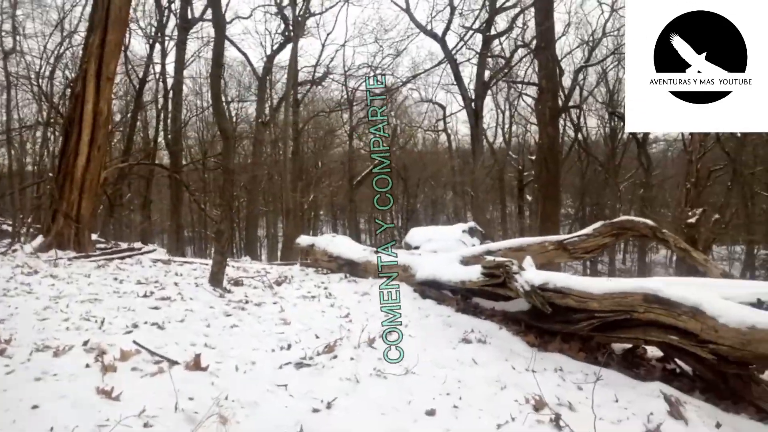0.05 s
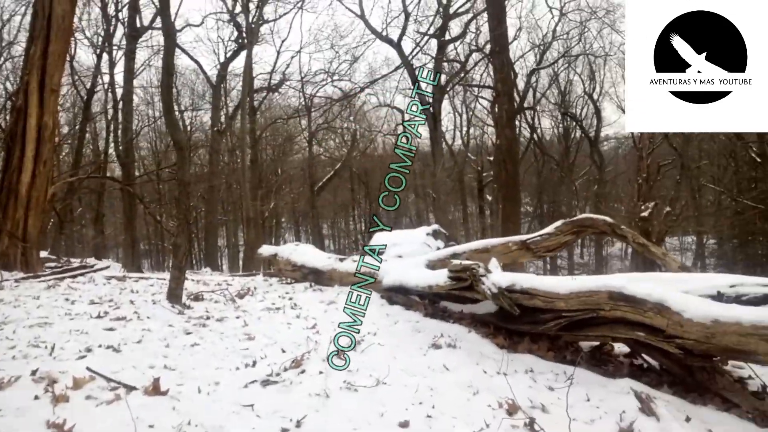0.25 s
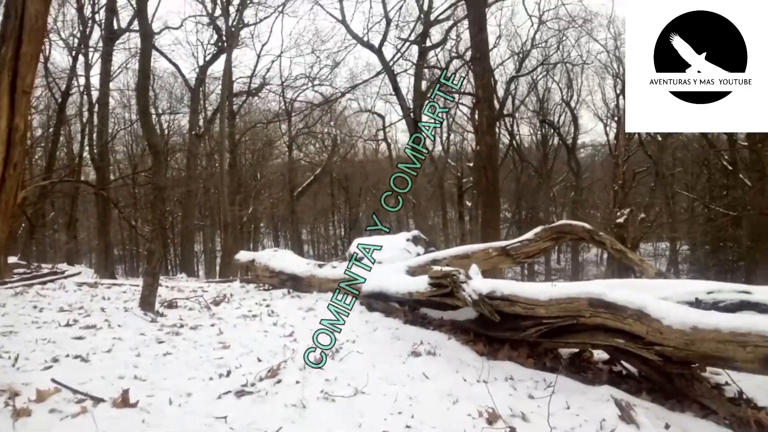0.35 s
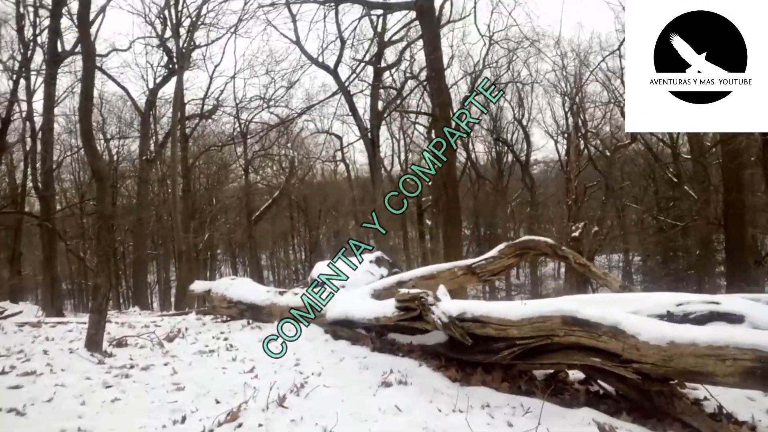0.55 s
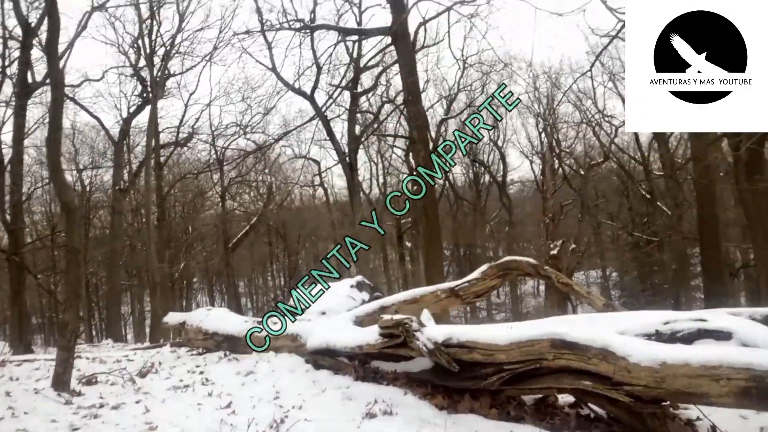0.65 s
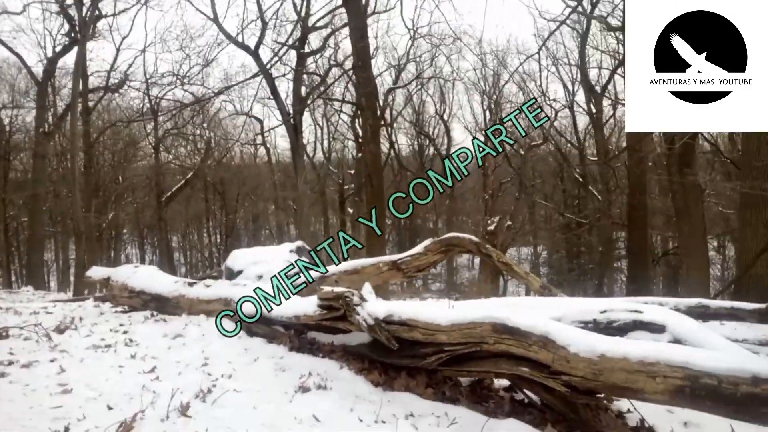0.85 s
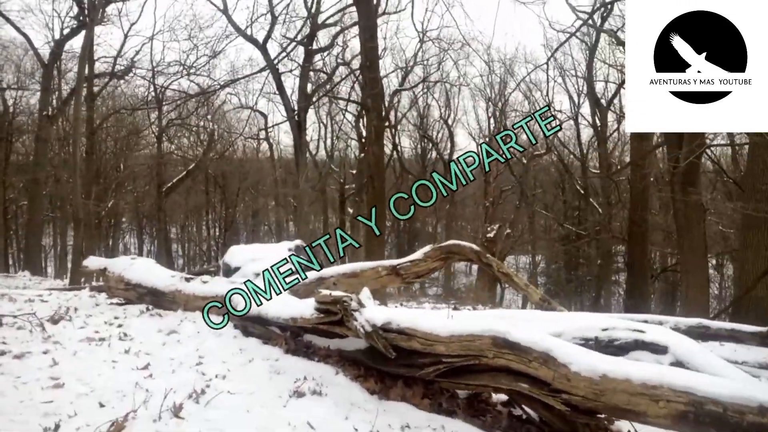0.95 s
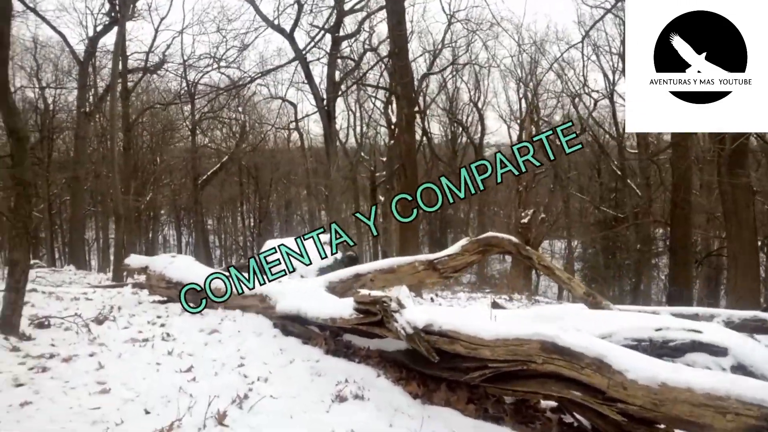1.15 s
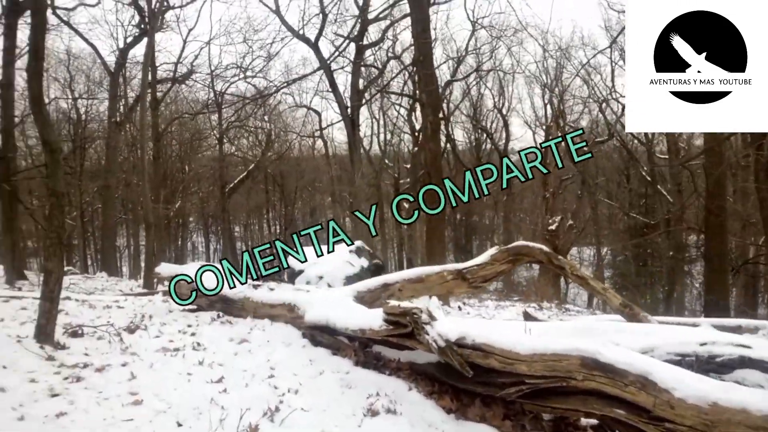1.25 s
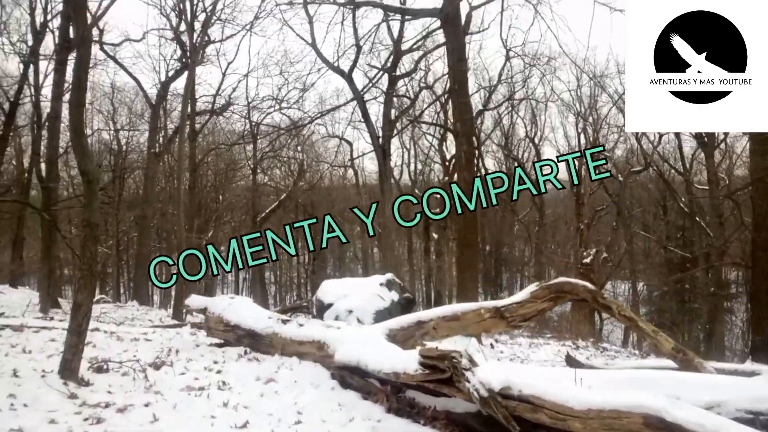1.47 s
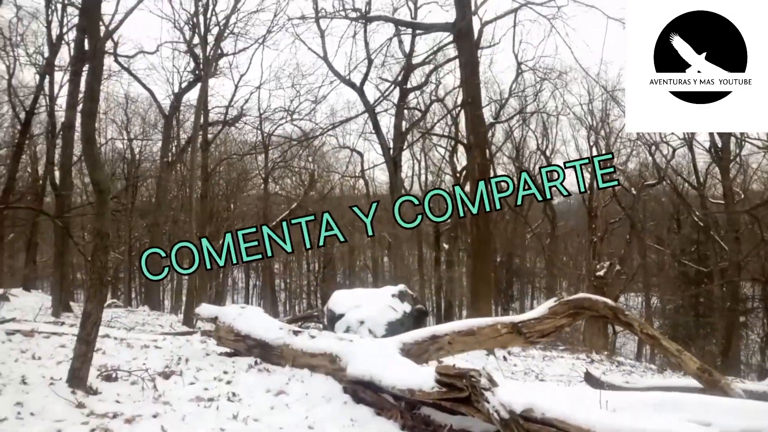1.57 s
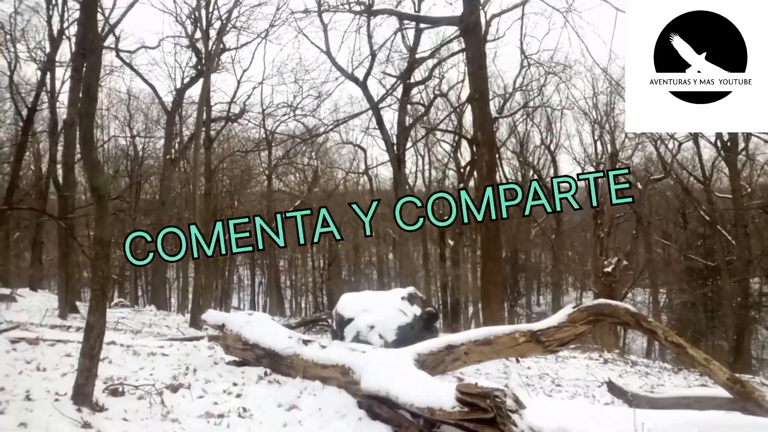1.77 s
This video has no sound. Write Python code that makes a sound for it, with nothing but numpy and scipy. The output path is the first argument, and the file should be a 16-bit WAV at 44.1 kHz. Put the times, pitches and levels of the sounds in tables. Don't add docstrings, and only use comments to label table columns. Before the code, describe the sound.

A boot breaks through crusted snow, a low thud leading into a sharp, splintering crunch, then crumbs settle and a softer step follows, heard close on a hand-held phone in a quiet winter forest.

```python
import sys
import numpy as np
from scipy import signal
from scipy.io import wavfile

SR = 44100
rng = np.random.default_rng(int(sys.argv[2]) if len(sys.argv) > 2 else 0)


def store_wav(level_fs):
    pcm = np.round(np.clip(np.atleast_2d(level_fs), -1, 1) * 32767)
    wavfile.write(sys.argv[1], SR, pcm.T.astype(np.int16))


def decibels_to_gain(level_db):
    exponent = np.asarray(level_db, float) / 20
    return 10 ** exponent


N = 79380


def unit_rms(x):
    return x / np.sqrt(np.mean(x ** 2) + 1e-20)


def level_at(spectrum, hz):
    points = np.array(spectrum)
    return np.interp(np.log(hz), np.log(points[:, 0]), points[:, 1])


def swell(peak_s, db, rise_s, fall_s):
    t = np.arange(N) / SR - peak_s
    distance = np.where(t < 0, -t / max(rise_s, 1e-3), t / max(fall_s, 1e-3))
    return decibels_to_gain(np.maximum(db - 20 * distance ** 0.95, -160))


def drift(rate_hz):
    r = np.exp(-2 * np.pi * rate_hz / SR)
    wander = signal.lfilter([1], [1, -2 * r, r * r], rng.standard_normal(N + 9000))
    return unit_rms(wander[9000:])


def ring(clicks, hz, t60):
    r, w = decibels_to_gain(-60 / (t60 * SR)), 2 * np.pi * hz / SR
    return signal.lfilter([0, np.sin(w)], [1, -2 * r * np.cos(w), r * r], clicks + 1e-18)


def low_cut(x, hz):
    return signal.sosfilt(signal.butter(5, hz, "high", fs=SR, output="sos"), x)


def bandpass(low_hz, high_hz):
    return signal.butter(2, [low_hz, high_hz], "band", fs=SR, output="sos")


def grains(bursts, spectrum, per_s, spread_db, cycles, clump_db, colour_db, low_hz, count=26):
    size_db = spread_db * np.minimum(rng.exponential(1, N), 3.0) + clump_db * drift(110)
    sizes = decibels_to_gain(size_db) * rng.choice([-1, 1], N)
    clicks = sizes * (rng.random(N) < per_s / SR)
    dealt = rng.integers(0, count, N)
    force = np.array([swell(*burst[:4]) for burst in bursts])
    tilt = np.array(bursts)[:, 4]
    colour = colour_db * rng.standard_normal((len(bursts), count))
    pitches = np.geomspace(low_hz, 8000, count)
    weight = decibels_to_gain(level_at(spectrum, pitches)) * np.sqrt(pitches)
    weight = weight / np.sqrt(np.sum(weight ** 2))
    out = 0
    for k, hz in enumerate(pitches):
        own = clicks * (dealt == k)
        t60 = cycles / hz
        gain = weight[k] / np.std(ring(own, hz, t60))
        push = decibels_to_gain(tilt * np.log2(hz / 2500) + colour[:, k]) @ force
        out = out + gain * ring(own * push, hz, t60)
    return low_cut(out, low_hz)


def crumbling_bands(rows, width):
    out, rough = 0, rng.standard_normal(N) * decibels_to_gain(2.0 * drift(120))
    for peak_s, db, rise_s, fall_s, hz in rows:
        sos = bandpass(hz / (1 + width), hz * (1 + width))
        swelling = signal.sosfilt(sos, swell(peak_s, db, rise_s, fall_s) * rough)
        out = out + swelling / np.std(signal.sosfilt(sos, rough))
    return out


def forest_air():
    # f [Hz], level [dB]
    air_spectrum = [(18, -37), (30, -4.5), (82, -1.5), (165, -7), (755, -10.5), (1900, -36), (2730, -33),
                    (7300, -40), (8000, -46), (10400, -90.5)]
    air_db = -60.5
    edges = 28 * 2 ** np.arange(0, 8.5, .5)
    out, white = 0, rng.standard_normal((2, N))
    for k, (low, high) in enumerate(zip(edges, edges[1:])):
        band = signal.sosfilt(bandpass(low, high), white[k % 2])
        out = out + band * decibels_to_gain(level_at(air_spectrum, np.sqrt(low * high)) + 1.5 * drift(8))
    return decibels_to_gain(air_db) * unit_rms(out)


def plate_snaps():
    # t [s], peak level [dB], ring f [Hz]
    snap_events = [(0.0041, -40.5, 1384), (0.118, -51, 2350), (0.1223, -49.5, 2340), (0.2363, -36, 3000),
                   (0.2495, -42, 1150), (0.29, -40, 3460), (0.3316, -31, 1310), (0.3449, -16.5, 5420),
                   (0.3781, -27, 2800), (0.3988, -29, 2770), (0.4057, -26.5, 2870), (0.411, -29, 3300),
                   (0.4208, -26, 2960), (0.435, -24, 1415), (0.4581, -24, 3240), (0.4671, -22.5, 1480),
                   (0.4762, -18.5, 1490), (0.4868, -13, 2300), (0.4889, -13, 1190), (0.501, -9.5, 1684),
                   (0.5157, -18.5, 1466), (0.5325, -34, 2620), (0.5455, -31.5, 1420), (0.5554, -37.5, 1150),
                   (0.573, -29.5, 1370), (0.5851, -31, 2050), (0.5894, -29, 1500), (0.602, -26, 1484),
                   (0.623, -37, 1770), (0.629, -29.5, 1540), (0.6447, -34, 1648), (0.6547, -41, 1720),
                   (0.6633, -37.5, 2170), (0.6814, -38.5, 1660), (0.6933, -44, 1610), (0.7027, -36.5, 1470),
                   (0.7136, -47.5, 1310), (0.7393, -43, 1860), (0.779, -47, 1750), (0.7984, -42, 1590),
                   (0.8147, -42, 3210), (0.8503, -36, 3200), (0.8673, -49, 1550), (0.9731, -44, 1360),
                   (0.9893, -43, 1420), (1.1106, -50, 2810), (1.122, -43, 2330), (1.2035, -40.5, 2900),
                   (1.21, -39, 2950), (1.25, -44, 3100), (1.28, -48, 2880), (1.302, -49, 2500),
                   (1.3586, -38, 864), (1.3888, -36, 1200), (1.3968, -31.5, 1406), (1.4132, -34, 1500),
                   (1.4213, -33.5, 960), (1.4461, -36.5, 2000), (1.504, -48, 1277), (1.7012, -61, 800)]
    ring_cycles = 24.5
    all_db, crack_db, crack_s = -1, -8, .002
    length = 800
    out, t = np.zeros(N + length), np.arange(length) / SR
    splinters = signal.sosfilt(bandpass(1500, 5500), rng.standard_normal((len(snap_events), length)))
    for (s, db, hz), noise in zip(snap_events, splinters / splinters.std()):
        onset = np.minimum(t / .0004, 1)
        body = np.sin(2 * np.pi * hz * t) * decibels_to_gain(-60 * t * hz / ring_cycles) * onset
        crack = decibels_to_gain(crack_db) * noise * np.exp(-t / crack_s)
        start = int(s * SR)
        out[start:start + length] += decibels_to_gain(db + all_db) * (body + crack)
    return low_cut(out[:N], 655)


def crumb_rustle():
    # peak t [s], level [dB], rise [s], fall [s], tilt [dB/octave]
    rustle_events = [(.008, -51, 0.037, 0.025, 2.5), (.081, -72, 0.0053, .01, 11),
                     (.053, -62.5, 0.0074, 0.056, 5), (.118, -57, 0.0094, 0.036, 5),
                     (.158, -65.5, 0.0073, 0.054, 4), (.2, -59.5, 0.0067, .01, 4),
                     (.603, -44.5, 0.081, 0.088, -4.5), (.64, -48, 0.045, 0.052, -3.5),
                     (.69, -51.5, 0.053, 0.071, -4), (.725, -52, 0.051, 0.032, -5),
                     (.781, -57, 0.003, 0.018, -1), (.798, -51, 0.028, 0.038, -2),
                     (.835, -57, 0.033, 0.022, -5.5), (.856, -50, 0.017, 0.026, 2.5),
                     (.977, -49, 0.019, 0.016, 1.5), (1.075, -64.5, 0.082, 0.12, 1),
                     (1.125, -58.5, 0.013, 0.045, 3), (1.197, -54, 0.0024, 0.0064, 3),
                     (1.209, -52, 0.019, 0.0093, 1), (1.22, -53.5, 0.0085, 0.0073, 2),
                     (1.252, -50.5, 0.027, 0.034, 1), (1.283, -56, 0.019, 0.026, 0),
                     (1.305, -55.5, 0.022, 0.018, -0.5), (1.55, -60.5, 0.067, .04, 5),
                     (1.605, -69, 0.013, 0.013, 6.5), (1.345, -60.5, 0.046, .02, 2),
                     (1.645, -72.5, 0.014, 0.014, 7.5), (1.72, -74, 0.018, 0.3, 0.5)]
    # f [Hz], level [dB per Hz]
    crumb_spectrum = [(530, -49), (900, -19), (1170, -5.5), (1650, -6.5), (4030, -16.5), (5400, -24),
                      (7300, -27.5), (8000, -38), (10400, -74)]
    return grains(rustle_events, crumb_spectrum, per_s=8000, spread_db=3.8, cycles=32.0,
                  clump_db=1.5, colour_db=3.5, low_hz=1278)


def sole_rubs():
    # peak t [s], level [dB], rise [s], fall [s], ring f [Hz]
    rub_events = [(.125, -66, .015, 0.032, 2230), (.68, -53, .12, 0.097, 1643),
                  (.7, -52.5, 0.029, 0.046, 4360), (.73, -64.5, 0.19, 0.042, 5430),
                  (.82, -56, 0.029, 0.09, 1620), (.855, -54, 0.11, 0.012, 3130),
                  (.98, -51, 0.013, 0.017, 2750), (.98, -52, 0.032, 0.019, 1410),
                  (1.21, -54.5, 0.024, 0.057, 2970), (.012, -54.5, 0.018, 0.017, 5610),
                  (.855, -62, 0.012, .025, 6000), (.855, -67, 0.009, .025, 4510),
                  (.79, -67, 0.042, 0.021, 5280), (1.252, -63, 0.012, 0.045, 4500),
                  (1.29, -56.5, 0.056, 0.036, 2840)]
    return crumbling_bands(rub_events, width=.055)


def body_jolts():
    # centre t [s], peak level [dB], ring f [Hz], length [s]
    jolt_events = [(0.019, -50.5, 77.5, 0.02), (0.224, -34, 104, 0.0089), (0.2356, -23.5, 92.3, 0.0071),
                   (0.2514, -34, 110, 0.0079), (0.268, -33.5, 104, 0.0084), (0.283, -37, 70, 0.015),
                   (0.161, -47.5, 240, 0.0044), (.08, -59.5, 90, 0.013), (0.459, -50.5, 70, .012),
                   (.345, -38.5, 89.2, 0.016), (0.404, -49.5, 62.6, 0.047), (0.4896, -23.5, 415, 0.0035),
                   (0.514, -35, 333, 0.0061), (0.49, -35, 203, 0.0094), (.515, -43.5, 110, 0.015),
                   (1.419, -33, 403, 0.0055), (1.36, -41.5, 844, 0.0039), (0.573, -43.5, 62, 0.016),
                   (0.669, -55.5, 85, 0.014), (0.794, -44.5, 66, 0.02), (0.866, -45.5, 56.7, 0.02),
                   (0.975, -51.5, 69, 0.018), (1.182, -55, 70.6, 0.014), (1.249, -49, 69, 0.0092),
                   (1.284, -44, 64, 0.012), (1.344, -51.5, 67.5, 0.039), (1.437, -49.5, 71, 0.0095),
                   (1.504, -50, 72, 0.039), (1.559, -53, 72, 0.017), (1.643, -50.5, 65.3, 0.015),
                   (1.743, -41.5, 72, 0.0081), (1.76, -40, 60, .012), (1.778, -44.5, 70, 0.0083)]
    knock = 0.21
    out = np.zeros(N)
    for s, db, hz, length in jolt_events:
        t = np.arange(N) / SR - s
        swing = np.cos(2 * np.pi * hz * t) + knock * np.cos(2 * np.pi * 1.95 * hz * t)
        out -= decibels_to_gain(db) * np.exp(-(t / length) ** 2) * swing
    return out


def snow_groans():
    # peak t [s], level [dB], rise [s], fall [s], ring f [Hz]
    groan_events = [(0.465, -39, 0.025, 0.05, 400), (.29, -54, 0.055, .04, 880),
                    (.495, -32, .025, 0.061, 340), (0.349, -51.5, 0.038, .03, 230),
                    (.615, -53, 0.12, 0.069, 407), (1.365, -47, .01, 0.024, 360),
                    (1.387, -37, 0.026, 0.04, 702), (1.412, -37.5, 0.017, 0.045, 696),
                    (1.408, -39.5, 0.083, 0.072, 299), (0.235, -51.5, 0.018, 0.08, 190),
                    (.54, -47, 0.017, 0.046, 200), (.51, -37.5, .03, 0.042, 770),
                    (1.2, -57.5, 0.18, 0.1, 275), (1.53, -56.5, 0.18, 0.057, 345),
                    (1.42, -44.5, 0.034, 0.038, 251)]
    return crumbling_bands(groan_events, width=.22)


def crust_fractures():
    # peak t [s], level [dB], rise [s], fall [s], tilt [dB/octave]
    crunch_events = [(.236, -48.5, 0.018, 0.0064, 1), (.256, -52, 0.038, 0.011, -12.5),
                     (.296, -48.5, 0.033, 0.02, -0.5), (.333, -43.5, 0.02, 0.0086, -14.5),
                     (.3455, -28, 0.004, 0.017, 4.5), (.362, -33.5, 0.021, 0.037, -4),
                     (.4, -44.5, 0.059, 0.04, 6), (.458, -27.5, 0.062, 0.094, -1.5),
                     (.489, -21.5, 0.013, 0.016, -5), (.503, -20, 0.0061, 0.014, -1),
                     (.517, -28.5, 0.0082, 0.0095, -7), (.55, -48.5, 0.067, 0.014, -6),
                     (.59, -44, .04, 0.14, -6), (.93, -63.5, 0.08, 0.088, -5.5),
                     (1.701, -75, .001, .004, 5.5), (.272, -55, .002, 0.0052, 5.5),
                     (1.358, -45, 0.0025, 0.057, -6.5), (1.39, -35.5, 0.037, 0.042, -4.5),
                     (1.422, -39, 0.025, 0.034, -5.5), (1.47, -55.5, 0.022, 0.25, -3.5)]
    # f [Hz], level [dB per Hz]
    crust_spectrum = [(440, -43), (750, -16.5), (1210, 1), (2100, -1.5), (2800, 2.5), (4640, -3.5),
                      (7030, -12.5), (8000, -0.5), (10400, -64)]
    return grains(crunch_events, crust_spectrum, per_s=8200, spread_db=3, cycles=19.5,
                  clump_db=0.0, colour_db=-0.5, low_hz=913)


def scene():
    loose = plate_snaps() + crumb_rustle() + sole_rubs()
    under_foot = body_jolts() + snow_groans() + crust_fractures()
    return (forest_air() + loose + under_foot)[None]


def roll_off(x):
    return signal.sosfilt(signal.butter(12, 8410, fs=SR, output="sos"), x)


def record(dry):
    cut = signal.sosfilt(signal.cheby2(12, 75, 8800, fs=SR, output="sos"), dry)
    return roll_off(cut)


dry = scene()
out = record(dry)
store_wav(out)
```